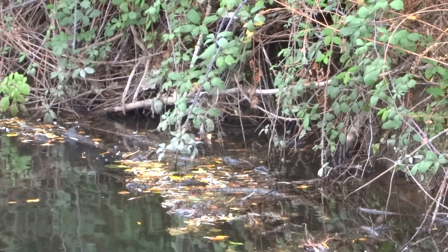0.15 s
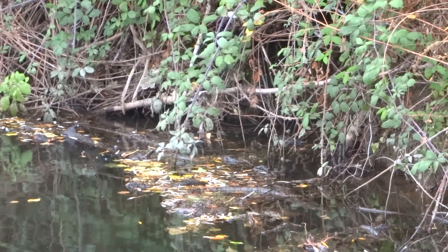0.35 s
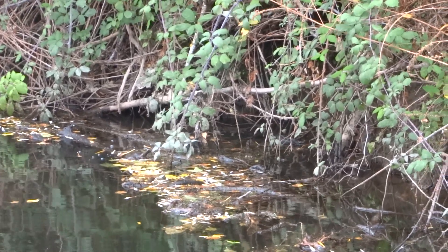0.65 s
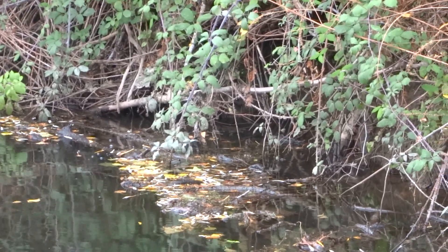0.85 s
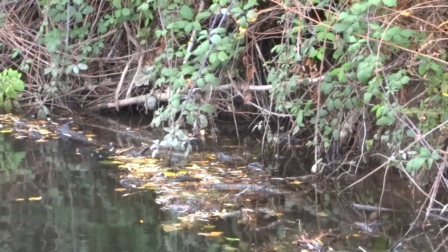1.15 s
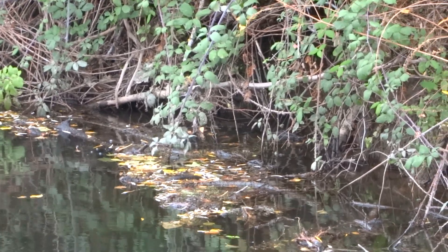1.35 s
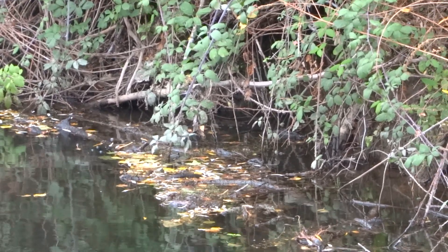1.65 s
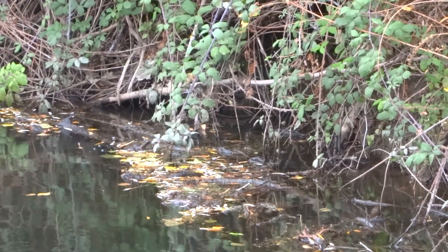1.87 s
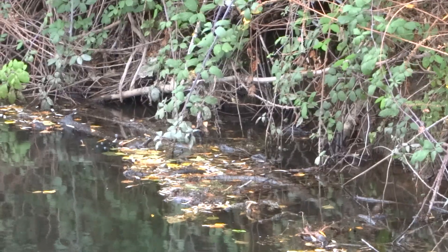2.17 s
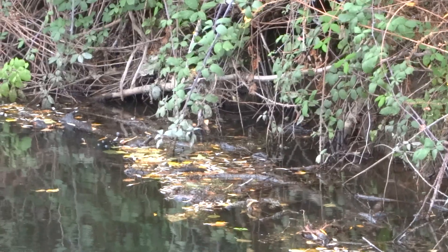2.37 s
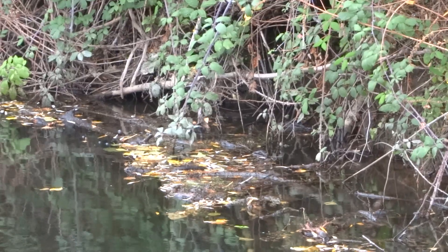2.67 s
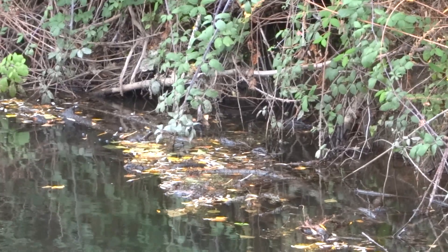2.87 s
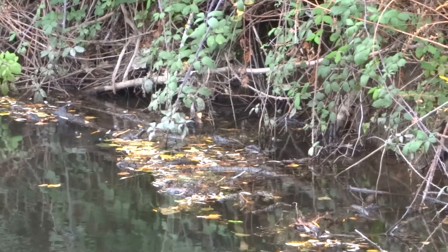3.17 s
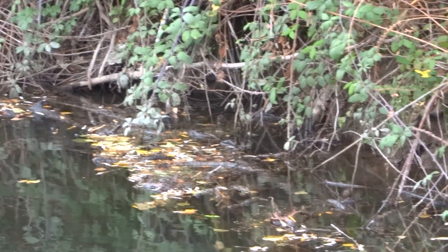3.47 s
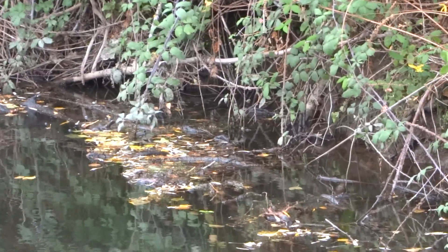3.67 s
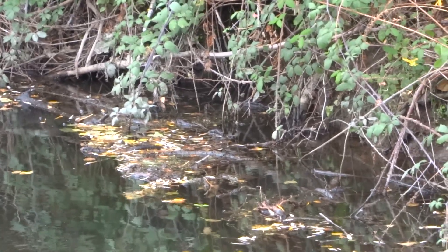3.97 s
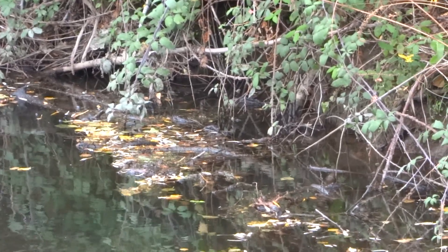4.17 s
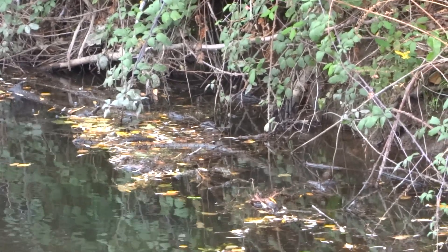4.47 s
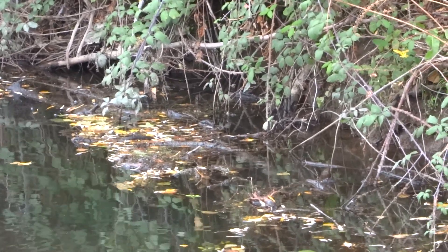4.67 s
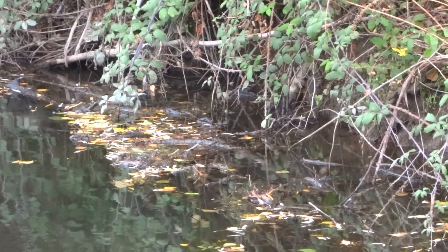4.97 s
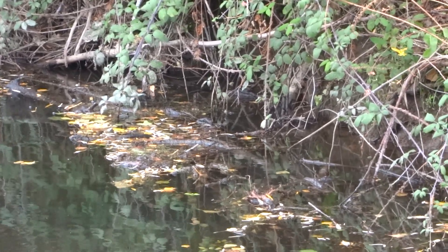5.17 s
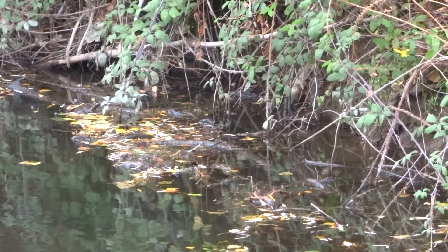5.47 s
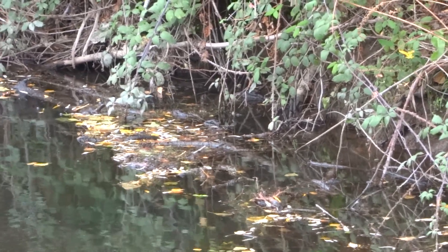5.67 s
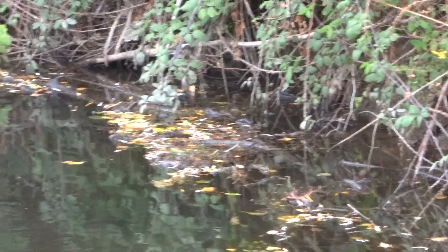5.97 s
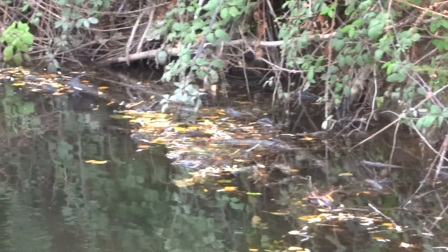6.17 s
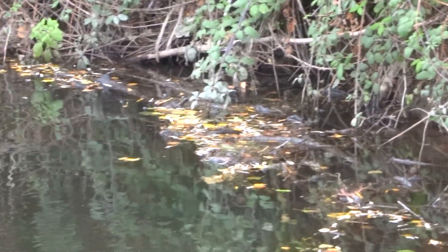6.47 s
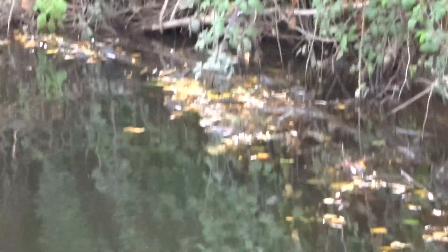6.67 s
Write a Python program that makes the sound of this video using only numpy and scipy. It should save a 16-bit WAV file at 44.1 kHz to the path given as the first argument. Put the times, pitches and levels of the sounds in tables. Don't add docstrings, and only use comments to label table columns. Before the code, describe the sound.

An unseen otter gives four short, high, arching whistles that echo off trees and bank, over a soft steady water hiss and faint birds.

```python
import sys
import numpy as np
from scipy import signal
from scipy.fft import rfft, irfft, next_fast_len
from scipy.io import wavfile
from scipy.ndimage import uniform_filter1d

SR = 44100
rng = np.random.default_rng(int(sys.argv[2]) if len(sys.argv) > 2 else 0)


def magnitude_from_level(level_db):
    exponent = np.asarray(level_db, float) / 20
    return 10 ** exponent


def transcribe(u):
    v = np.clip(np.atleast_2d(u).T, -1, 1)
    q = np.round(v * 32767).astype(np.int16)
    wavfile.write(sys.argv[1], SR, q)


N = 300742


def evened(x):
    return x / np.sqrt(np.mean(x ** 2) + 1e-20)


def smoothed_twice(x, size, axes=(0, 0)):
    for axis in axes:
        x = uniform_filter1d(x, size, axis)
    return evened(x)


def read(points, hz):
    f, value = np.transpose(points)
    return np.interp(np.log(hz + 1), np.log(f + 1), value)


def add(mix, start, sound):
    part = mix[..., round(start * SR):][..., :sound.shape[-1]]
    part += sound[..., :part.shape[-1]]


# [f/Hz, lead/radians]
PORT_LEAD = [(60, 0), (250, -.45), (600, -1.1), (950, -1.2), (2070, -.7), (4480, -.5), (8530, -.2),
             (15300, 0)]


def port_turn(hz):
    return np.exp(-1j * read(PORT_LEAD, hz))


def ports(x):
    length = x.shape[1]
    size = next_fast_len(length)
    turn = port_turn(np.fft.rfftfreq(size, 1 / SR))
    right = irfft(rfft(x[1], size) * turn, size)[:length]
    return np.array([x[0], right])


# [f/Hz, likeness 0-1]
LIKENESS = [(60, 0.94), (150, 0.98), (350, 0.59), (800, 0.72), (1500, 0.54), (3000, 0.88), (6000, 1),
            (9000, 0.87), (12500, 0.95)]
# [f/Hz, level/dB]
LEFT_TILT = [(60, -1), (130, 0.5), (290, 0), (640, 1.0), (1410, 1.5), (3100, 3), (6820, 3.5), (15000, -1)]


def noise(spectrum, size, patchy_db):
    frames = 4 * N // size + 5
    hz = np.fft.rfftfreq(size, 1 / SR)
    a, b, c, d, patches = rng.standard_normal((frames, len(hz), 5)).T
    patches = smoothed_twice(patches, 12, axes=(0, 1))
    same = np.clip(read(LIKENESS, hz), 0, 1)[:, None]
    left = a + 1j * b
    right = same * left + np.sqrt(1 - same ** 2) * (c + 1j * d)
    right = right * port_turn(hz)[:, None]
    tilt = magnitude_from_level(read(LEFT_TILT, hz) / 2)[:, None]
    colour = magnitude_from_level(read(spectrum, hz)[:, None] + patchy_db * patches)
    z = np.array([left * tilt, right / tilt]) * colour
    x = signal.istft(z, nperseg=size, noverlap=size * 3 // 4)[1][:, :N]
    return x / np.sqrt(np.mean(x.mean(0) ** 2))


# [f/Hz, level/dB per Hz]
WEIR_COLOUR = [(59, -18.5), (100, -8), (200, -3.5), (600, -3.5), (1300, -5), (2500, -6), (5000, -7),
               (6800, -9), (7600, -13), (8800, -18), (10300, -17), (12500, -18.5), (14500, -24.5),
               (15600, -25.5)]


def weir_and_leaves():
    return magnitude_from_level(-55.5) * noise(WEIR_COLOUR, size=1024, patchy_db=0.83)


# [f/Hz, level/dB per Hz]
AIR_COLOUR = [(8.8, -43), (15, -4), (59, -1), (76, 2.5), (119, -6.5), (156, -4), (200, -27), (260, -46),
              (440, -120)]
# [middle t/s, level/dB, half width t/s]
GUST_TIMES = [(1.6, -68, 0.045), (1.92, -68.5, 0.17), (2.47, -63.5, .07), (3.2, -75, .1),
              (3.95, -68.5, .04), (5.58, -74, 0.054), (5.83, -66.5, 0.071), (6.33, -77, 0.071),
              (6.7, -81, 0.2), (3.7, -76, 0.089), (2.25, -74, 0.11)]


def air():
    t = np.arange(N) / SR
    push = magnitude_from_level(-80.5)
    for middle, db, width in GUST_TIMES:
        push = push + magnitude_from_level(db) * np.exp(-((t - middle) / width) ** 2)
    return push * noise(AIR_COLOUR, size=4096, patchy_db=-2.5)


# [f/Hz, t/s]
ECHO_FADE = [(3000, 0.19), (5000, 0.59), (10000, 0.4), (15000, 0.18)]
# [level/dB, factor on fade time]
FAR_WOOD = (-11, 1.42)
# [delay t/s, spread t/s, level/dB]
EARLY_RETURN = (0.018, 0.014, 3)
# [delay t/s, spread t/s]
LATE_RETURN = (.44, .045)


def echoes(gap_s, spread, trees_db):
    t = np.arange(SR) / SR
    taps = np.zeros((2, SR))
    at = np.arange(0, SR - 20, 20) + rng.integers(0, 20, (2, (SR - 1) // 20))
    np.put_along_axis(taps, at, rng.choice([-1., 1.], at.shape), 1)
    taps *= np.clip(t / gap_s - .5, 0, 1)
    bunch_db = 0
    for delay, width, db in (EARLY_RETURN, (*LATE_RETURN, trees_db)):
        bunch_db = bunch_db + db * np.exp(-((t - delay) / width) ** 2)
    taps *= magnitude_from_level(bunch_db)
    taps[1] = np.sqrt(1 - spread ** 2) * taps[0] + spread * taps[1]
    hz, _, z = signal.stft(taps, SR, nperseg=256)
    frame_t = _
    fade_db = -60 * frame_t / read(ECHO_FADE, hz)[:, None]
    wood_db, slower = FAR_WOOD
    fade = np.hypot(magnitude_from_level(fade_db), magnitude_from_level(wood_db + fade_db / slower))
    tail = signal.istft(z * fade, SR, nperseg=256)[1]
    return tail / np.linalg.norm(tail[0])


# [middle t/s, level/dB, length t/s]
TWO_NOTE_TRILL = [
    (.06, -62, .055),
    (.19, -61, .045),
    (.283, -61, .045),
    (.362, -62, .03),
]
# [middle t/s, level/dB, f/Hz, glide f/Hz]
FAR_NOTES = [(.32, -66, 6900, 0), (.62, -66, 6200, -300), (.75, -69, 7400, -200), (.78, -66, 6550, 0),
             (1.165, -68, 7200, 400), (1.515, -65, 5600, 300), (1.55, -65, 7000, -200),
             (1.68, -67, 5000, -300), (1.76, -69, 7800, 400), (1.815, -59, 4550, 700),
             (2.04, -66, 7450, -100), (2.3, -67, 7400, 0), (2.375, -65, 7000, -500),
             (2.58, -61, 4200, -100), (2.875, -65, 7100, -600), (3.17, -66, 7300, -400),
             (3.2, -67, 6900, -200), (4.295, -65, 5300, 700), (5.055, -63, 5450, 800),
             (5.295, -64, 6400, 0), (6.42, -67, 6550, 0), (6.65, -67, 6700, -500)]


def bird_notes():
    start_hz, sag_hz_per_s = 4370, 450
    above_hz, upper_db, share = 520, -1, .7
    rows = []
    for middle, db, length in TWO_NOTE_TRILL:
        hz = start_hz - sag_hz_per_s * middle
        rows.append((middle, db, hz, 0, length))
        rows.append((middle, db + upper_db, hz + above_hz, 0, share * length))
    return rows + [(*row, .036) for row in FAR_NOTES]


def birds():
    out = np.zeros(N)
    waver_hz = 150 * smoothed_twice(rng.standard_normal(N), 200)
    for middle, db, hz, glide_hz, length in bird_notes():
        u = np.linspace(-.5, .5, round(length * SR))
        pitch = hz + glide_hz * u + waver_hz[round(middle * SR):][:len(u)] / 2
        tone = np.sin(2 * np.pi * np.cumsum(pitch) / SR)
        add(out, middle - length / 2, magnitude_from_level(db) * 2 * np.hanning(len(u)) * tone)
    trees = echoes(gap_s=0.0028, spread=0.41, trees_db=0)[:, :SR // 10]
    blur = signal.fftconvolve(out[None], trees, axes=1)[:, :N]
    return ports(out + magnitude_from_level(-7) * blur) * magnitude_from_level([[1.2], [-1.2]])


# [t/s, level/dB, f/Hz, 60 dB fade t/s]
FINGER_TICK = (5.817, -38.5, 2200, .004)
# [middle t/s, level/dB, f/Hz, length t/s]
HAND_BUMPS = [
    (0.051, -51.5, 60.4, 0.017),
    (0.183, -43, 65, 0.028),
]


def housing():
    out = np.zeros(N)
    start, db, hz, fade_s = FINGER_TICK
    t = np.arange(400) / SR
    fade_db = db - 60 * t / fade_s
    add(out, start, -magnitude_from_level(fade_db) * np.cos(2 * np.pi * hz * t))
    add(out, start + .0013, magnitude_from_level(fade_db - 6) * np.cos(np.pi * hz * t))
    for middle, db, hz, length in HAND_BUMPS:
        t = np.arange(-length / 2, length / 2, 1 / SR)
        add(out, middle - length / 2, magnitude_from_level(db) * np.hanning(len(t)) * np.sin(2 * np.pi * hz * t))
    return out


# [start t/s, fall t/s, top f/Hz, end f/Hz, bend of the fall]
ARCHES = [
    (.432, .077, 5235, 4400, 2.8),
    (1.987, .068, 5135, 4050, 3.5),
    (3.332, .058, 5205, 4550, 2.8),
    (4.694, .073, 5010, 2300, 3.5),
]
# [level/dB, attack t/s, middle swell/dB, second partial level/dB, its swell/dB]
EFFORTS = [
    (-35.5, 0.019, -8, -56.5, -2),
    (-35, 0.025, -1.5, -48.5, 1),
    (-28.5, 0.031, 2.5, -69.5, 6.5),
    (-23, 0.03, 6.5, -50.5, 3.5),
]
# [echo level/dB against direct, same for overtones/dB, third partial/dB, left over right/dB]
HEAD_TURNS = [
    (0.5, 7, -30, 3.5),
    (0.5, -1, -28, 3.5),
    (-12, 16.5, -49, 4),
    (-16, -1, -45, 3.5),
]
TREE_RETURNS = [17, 2, 4, 9]


def whistle(arch, effort, head_turn, trees_db):
    start, fall, top_hz, end_hz, bend = arch
    level_db, attack, swell_db, second_db, second_swell_db = effort
    echo_db, over_echo_db, third_db, pan_db = head_turn
    start_hz, rise_s, rise_bend = 4500, .093, 2.4
    t = np.arange(0, rise_s + fall, 1 / SR)
    climb_hz = (top_hz - start_hz) * np.clip(1 - t / rise_s, 0, 1) ** rise_bend
    drop_hz = (top_hz - end_hz) * np.clip((t - rise_s) / fall, 0, 1) ** bend
    turn = 2 * np.pi * np.cumsum(top_hz - climb_hz - drop_hz) / SR

    onset = -11 * uniform_filter1d(np.clip(1 - t / attack, 0, 1), size=300, mode="nearest")
    onset = onset - 20 / (1 + np.exp((t - attack) / 0.0041))
    swell = np.sin(np.pi * (t / t[-1]) ** 1.13) ** 2
    loss = -41.5 * (drop_hz / 1000) ** 2.16
    thread_db = -33
    first = magnitude_from_level(level_db + onset + swell_db * swell + np.maximum(loss, thread_db))
    second = magnitude_from_level(second_db + .4 * onset + second_swell_db * swell + 0.41 * loss)
    third = first ** 1.75 / first.max() ** 0.74 * magnitude_from_level(third_db)

    edge = np.sqrt(2) * signal.windows.tukey(len(t), .08)
    tone = edge * first * np.sin(turn)
    over = edge * (second * np.sin(2 * turn) + third * np.sin(3 * turn))
    thrown = magnitude_from_level(echo_db) * tone + magnitude_from_level(over_echo_db) * over
    shore = echoes(gap_s=0.0067, spread=0.32, trees_db=trees_db)
    heard = signal.fftconvolve(thrown[None], shore, axes=1)
    add(heard, 0, np.array([tone + over] * 2))
    return start, ports(heard) * magnitude_from_level([[pan_db / 2], [-pan_db / 2]])


def scene():
    mix = weir_and_leaves() + air() + birds() + housing()
    for row in zip(ARCHES, EFFORTS, HEAD_TURNS, TREE_RETURNS):
        add(mix, *whistle(*row))
    return mix


def roll_off(x):
    return signal.sosfilt(signal.butter(12, 15740, fs=SR, output="sos"), x)


def record(dry):
    low_pass = signal.firwin(1023, 15730, window=("kaiser", 9), fs=SR)
    limited = signal.oaconvolve(dry, low_pass[None], "same")
    return roll_off(limited)


dry = scene()
out = record(dry)
transcribe(out)
```